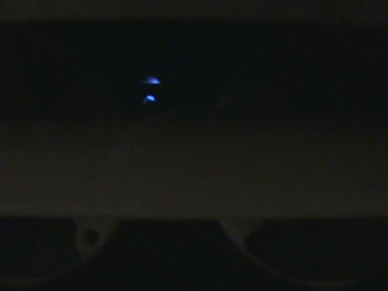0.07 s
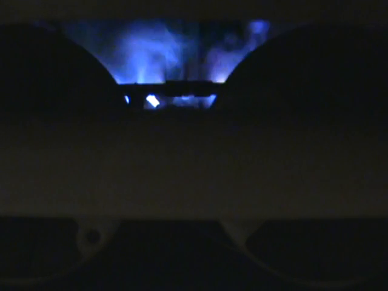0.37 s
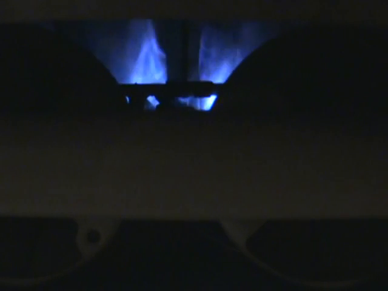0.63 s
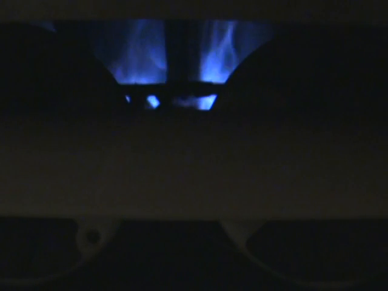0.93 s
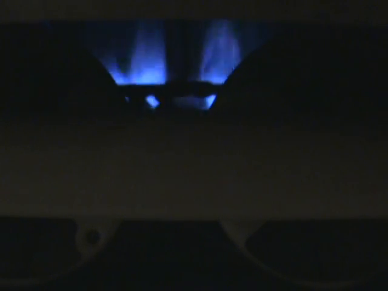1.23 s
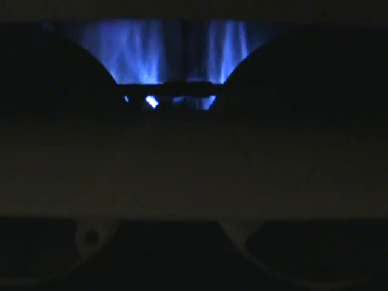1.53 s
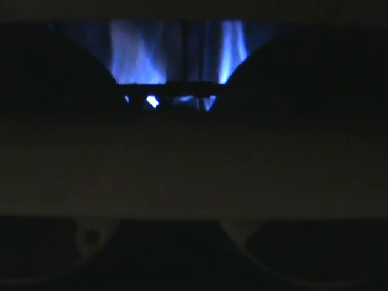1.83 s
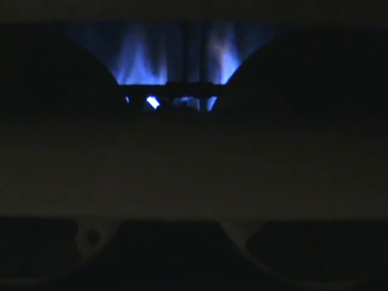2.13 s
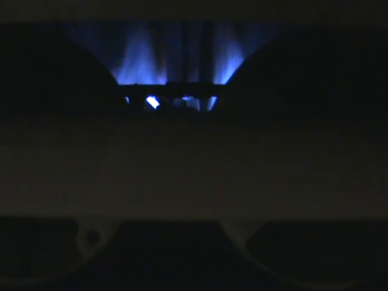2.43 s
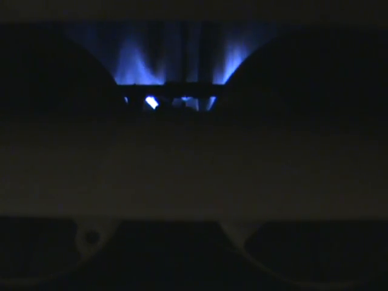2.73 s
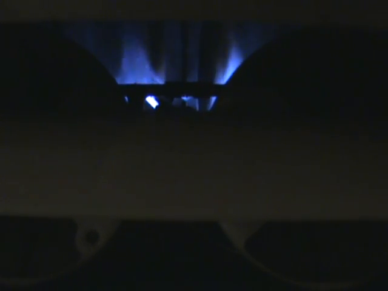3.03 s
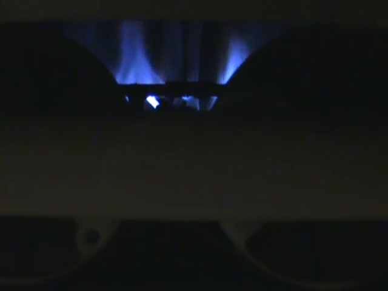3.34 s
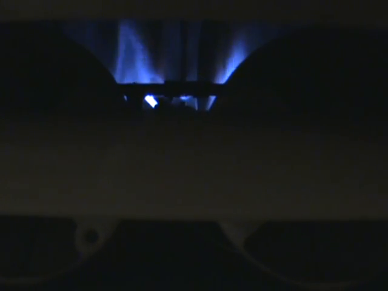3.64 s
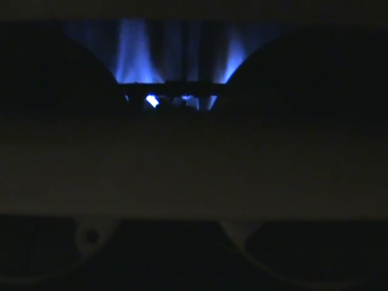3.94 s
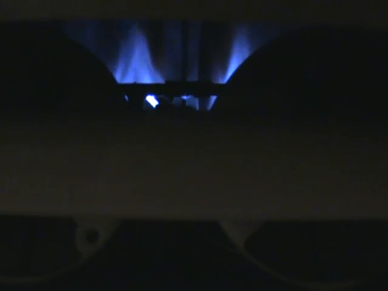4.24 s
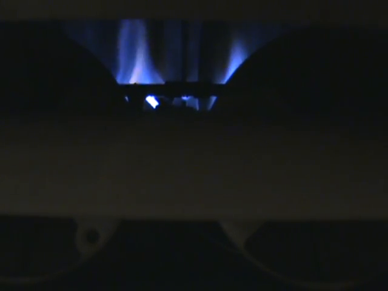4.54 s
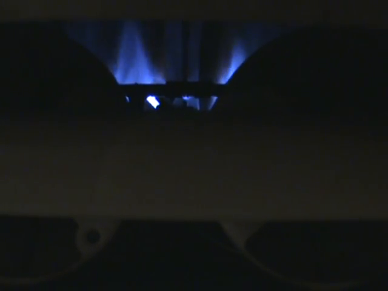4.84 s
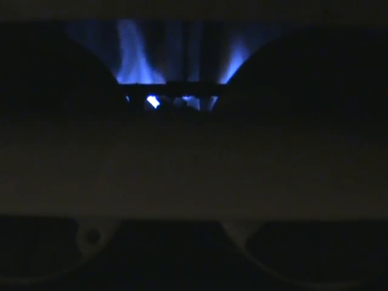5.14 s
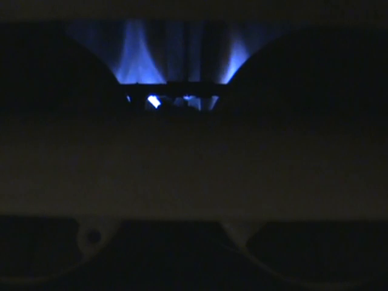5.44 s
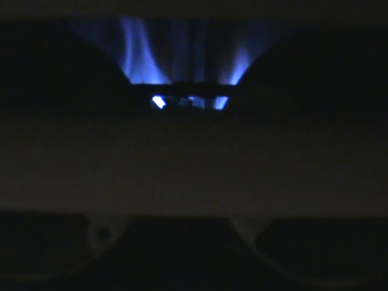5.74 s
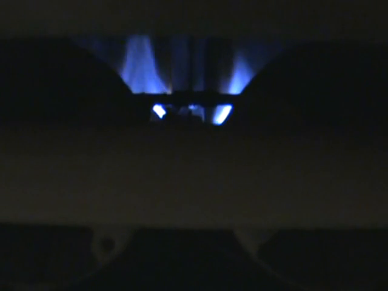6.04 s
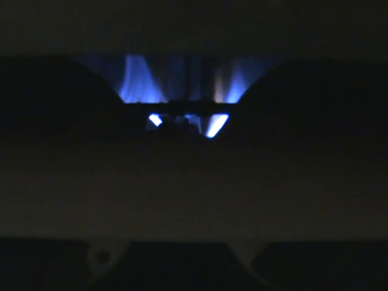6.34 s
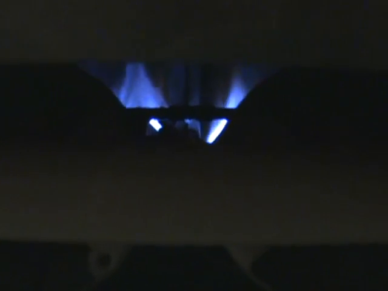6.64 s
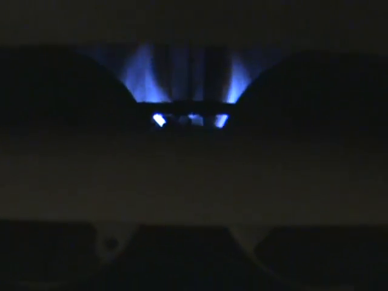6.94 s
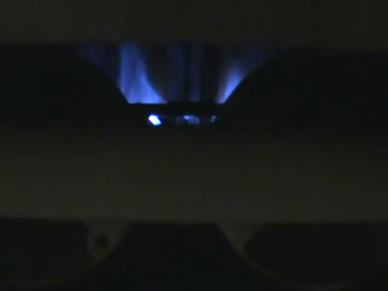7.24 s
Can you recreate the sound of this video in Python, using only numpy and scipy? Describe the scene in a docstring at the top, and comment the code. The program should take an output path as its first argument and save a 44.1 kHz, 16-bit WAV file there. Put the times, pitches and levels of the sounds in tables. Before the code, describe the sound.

A gas furnace clacks and lights with a low whoosh, then roars and hisses while its igniter ticks rapidly, stopping near the end.

```python
"""Beside a gas furnace as it lights. The valve clacks open, gas hisses from the jet and rushes through
the burner tube, and an igniter sparks 15 times a second. The gas catches with a low whoosh and a brief
howl, then the flames roar and boom in the chamber, whose resonances (the notes it favours) shift as
the gas in it heats up. The igniter stops shortly before the end."""
import sys
import numpy as np
from scipy import signal
from scipy.fft import rfft, irfft
from scipy.io import wavfile
from scipy.ndimage import uniform_filter1d

SR = 44100
rng = np.random.default_rng(int(sys.argv[2]) if len(sys.argv) > 2 else 0)


def wav_out(sig):
    """Save sig, one row per channel (or a flat mono array), as 16-bit PCM at SR to the path in sys.argv[1]."""
    wavfile.write(sys.argv[1], SR, np.round(np.clip(np.atleast_2d(sig).T, -1, 1) * 32767).astype(np.int16))


N = 325899
TIME = np.arange(N) / SR

# The tone of a spark or a sharp knock. Each row: frequency in Hz, relative level in dB.
CRACK = [(400, -13.5), (1300, -6.5), (2200, -13), (3600, -7.5), (4400, -3.5), (5400, -5.5), (6700, -1.5),
         (8000, -1.5), (9500, -1.5), (11200, -3.5), (13500, -7.5), (15400, -7), (16500, -21)]
# The gas flow, which falters while the burner lights.
# Each row: time in seconds, level of the tube's rush in dB, level of the jet's hiss in dB.
FLOW = [(0, -40, -38), (.05, -37.5, -46), (.1, -43.5, -49), (.17, -36.5, -33), (.32, -36, -32),
        (.39, -47, -36.5), (.55, -33, -33), (.63, -40.5, -38), (1.1, -37, -37), (2, -36.5, -31.5),
        (7.39, -36.5, -32)]
# Resonances of the burner tube, before heat shifts them. Each row: pitch in Hz, width in Hz, lift in dB.
TUBE = [(1653, 80, 11), (1845, 42, 10.5), (2100, 110, 7.5), (2406, 147, 8), (2658, 74, 9), (2958, 108, 9.5),
        (3215, 94, 10), (3530, 120, 10.5)]


def gain_of(db):
    """Turns decibels into a factor to multiply a sound by."""
    return 10 ** (np.asarray(db) / 20)


def evened(x):
    """Scales a signal to an average strength (rms) of 1."""
    return x / np.sqrt(np.mean(abs(x) ** 2) + 1e-20)


def read(rows, hz, column=1):
    """Looks up a table by frequency, gliding between rows on a log scale."""
    table = np.transpose(rows)
    return np.interp(np.log(hz + 1), np.log(table[0] + 1), table[column])


def curve(rows, t=TIME, column=1):
    """Looks up a table by time, gliding between rows."""
    table = np.transpose(rows)
    return np.interp(t, table[0], table[column])


def peaks(modes, hz):
    """The lift in dB that a set of resonances gives each frequency."""
    return sum(db / (1 + (2 * (hz - pitch) / width) ** 2) for pitch, width, db in modes)


def envelope(start_s, rise_s, end_s, fade_s):
    """A level that rises in a straight line, holds until end_s, then dies away."""
    return np.clip((TIME - start_s) / rise_s, 0, 1) * np.exp(-np.maximum(TIME - end_s, 0) / fade_s)


def swells(rows):
    """Rounded rises in level, each with its length taken at half height."""
    return sum(gain_of(db) * np.exp2(-abs(2 * (TIME - s) / length) ** np.e) for s, length, db in rows)


def wander(rate_hz):
    """A smooth random wobble, with little movement faster than rate_hz."""
    hz = np.fft.rfftfreq(N, 1 / SR)
    return evened(irfft(rfft(rng.standard_normal(N)) * np.exp(-(hz / rate_hz) ** 2), N))


def add(mix, start_s, sound):
    """Mixes a stereo sound in at its start time."""
    part = mix[:, max(round(start_s * SR), 0):][:, :sound.shape[1]]
    part += sound[:, :part.shape[1]]


def stereo_spectra(hz, shape):
    """Random spectra as the left and right openings of a microphone hear them."""
    # Each row: frequency in Hz, likeness of the sides (0-1), left's lead in radians, left over right in dB.
    ports = [(30, 0.75, -0.9, 2), (101, 0.98, -1.36, -0.5), (220, 0.81, -1.42, -1), (407, 1, -2, -0.5),
             (656, 0.79, -1.5, -1), (884, 0.95, -1.5, -0.5), (1170, 0.29, -0.5, -1.5),
             (1970, 0.99, -1.1, -2), (3740, 0.71, 0.1, 0.7), (5550, 0.92, 0.5, -0.4),
             (7660, 0.97, 0.42, -1), (9870, 0.8, -0.9, 0), (11720, 0.9, 1.63, 1), (13300, 0.5, 4, 3),
             (14500, 0.7, 1, 0), (15300, .43, -2.5, 1)]
    a, b, c, d = rng.standard_normal((4, *shape))
    same = np.clip(read(ports, hz), 0, 1)
    left = a + 1j * b
    lag = np.exp(-1j * read(ports, hz, column=2))
    right = (same * left + np.sqrt(1 - same ** 2) * (c + 1j * d)) * lag
    lean = gain_of(read(ports, hz, column=3) / 2)
    return np.array([left * lean, right / lean])


def burst(colour, bright_db, size=4096):
    """Short stereo noise with the tone colour(hz), tilted by bright_db per octave above 4000 Hz."""
    hz = np.fft.rfftfreq(size, 1 / SR)
    tilt = bright_db * np.log2(np.maximum(hz, 4000) / 4000)
    return evened(irfft(stereo_spectra(hz, hz.shape) * gain_of(colour(hz) + tilt)))


def turbulence(colour, size=2048):
    """The stereo noise of swirling gas, with its tone in dB given by colour(hz, speed of sound)."""
    # Sound travels faster in hotter gas. Each row: time in seconds, relative speed of sound.
    heat = [(.15, 0.89), (.3, 1.02), (.5, 1.04), (.68, 1.15), (1.1, 1.1), (1.4, 1.044), (2.4, 1),
            (7.39, 1.003)]
    hop = size // 4
    t, hz = np.arange(N // hop + 5) * hop / SR, np.fft.rfftfreq(size, 1 / SR)
    spectra = stereo_spectra(hz, (len(t), len(hz))) * gain_of(colour(hz, curve(heat, t)[:, None]))
    _, noise = signal.istft(spectra.transpose(0, 2, 1), nperseg=size, noverlap=size - hop)
    return evened(noise[:, :N])


def valve(knock_s=0.0018, casing_db=-22, casing_s=0.037):
    """The plunger leaves and hits its stop: it knocks, the valve body rings and the casing echoes."""
    # Each row: start in seconds, level in dB, share that rings the valve body.
    knocks = [(.0025, -13, 0.11), (.0045, -22, 0.17), (.009, -12.5, 0.78)]
    # Valve body and gas pipe. Each row: pitch in Hz, relative level in dB, seconds to fade by 60 dB.
    body_modes = [(336, -25, .4), (545, -32.5, 0.86), (788, -26, 0.22), (1567, -27, 0.54), (1760, -26, 0.5),
                  (1910, -21, 0.058), (2900, -23, 0.13), (6240, -1, 0.034), (6900, -6, 0.036),
                  (7900, -5, 0.072), (8450, 4, 0.025), (8850, -1.5, .04), (9430, 3, 0.024)]
    out, t = np.zeros((2, N)), np.arange(16384) / SR
    fade = np.exp(-t / knock_s) + gain_of(casing_db) * np.exp(-t / casing_s)
    for start, db, share in knocks:
        knock = burst(lambda hz: read(CRACK, hz), bright_db=-2, size=len(t)) * fade
        ring = sum(gain_of(level - 60 * t / ring_s) * np.sin(2 * np.pi * (hz * t + rng.random()))
                   for hz, level, ring_s in body_modes)
        add(out, start, gain_of(db) * (knock + share * ring))
    return out


def jet(flutter_db=0.67, ripple_db=0.5, dulling=14):
    """Gas hisses out of a small hole; the casing's many small resonances ripple its tone."""
    # Each row: frequency in Hz, relative level in dB.
    hiss_tone = [(3000, -22), (3900, -6.5), (4400, -2), (5250, 1), (6600, 0), (7100, -3.5), (7900, -2.5),
                 (9500, -5), (10600, -11), (12000, -10), (13600, -18), (15300, -13), (16000, -30)]
    # Resonances of the steel casing. Each row: pitch in Hz, width in Hz, lift in dB.
    casing = [(3990, 69, -1), (3950, 56, 4.5), (4990, 62, 3), (5340, 87, 5), (5400, 85, -1),
              (6730, 240, 1.5), (7440, 92, 6.5), (8340, 130, 4), (9950, 220, 7)]

    def colour(hz, speed):
        """The hiss through the casing; its treble dulls while the gas is hottest."""
        ripple = evened(uniform_filter1d(rng.standard_normal(len(hz)), size=2))
        treble_loss = dulling * np.maximum(speed - 1, 0) * np.log2(np.maximum(hz / 8000, 1))
        return read(hiss_tone, hz) + peaks(casing, hz) + ripple_db * ripple - treble_loss
    return turbulence(colour) * gain_of(curve(FLOW, column=2) + flutter_db * wander(36))


def burner(throat_db=-39.5, throat_follow=0.4, build_s=0.057, flutter_db=0.5):
    """Gas and air sound the burner tube's higher resonances, and its throat as the draught builds."""
    # In both tables, each row: frequency in Hz, relative level in dB.
    rush_tone = [(300, -8.5), (700, -7), (1020, -10.5), (1150, 1.5), (1400, 0.5), (1550, -5), (2400, -4.5),
                 (3200, -2), (3560, -5), (3750, -11.5), (4500, -30), (7000, -30)]
    throat_tone = [(600, -33), (760, -13.5), (810, -5.5), (865, 1), (960, -1.5), (1005, -24), (1200, -63)]
    rush = turbulence(lambda hz, speed: read(rush_tone, hz) + peaks(TUBE, hz / speed ** 0.46))
    throat = turbulence(lambda hz, speed: read(throat_tone, hz / speed)) * (1 - np.exp(-TIME / build_s))
    flow_db = curve(FLOW)
    both = rush * gain_of(flow_db) + throat * gain_of(throat_db + throat_follow * (flow_db - flow_db[-1]))
    return both * gain_of(flutter_db * wander(26))


def igniter(first_s=0.0491, period_s=0.06666, count=98, boost_db=5.5, uneven_db=0.43, alike=0.61):
    """Sparks fire on a steady clock. Each snaps, bounces off the nearest steel wall and scatters."""
    # The electrode and its bracket ring. Each row: pitch in Hz, width in Hz, lift in dB.
    bracket = [(2190, 300, 9.5), (4250, 680, 4), (6480, 1100, 4), (9130, 830, 2.5)]
    # Sparks are weak in still air and as the flame passes. Each row: time in seconds, relative level in dB.
    strength = [(.05, -35.5), (.18, -24.5), (.316, -24.5), (.38, -31.5), (.6, -28.5), (1, -24.5),
                (1.45, -22), (2.2, -26), (2.55, -23.5), (6.5, -24.5)]
    out, t = np.zeros((2, N)), np.arange(4096) / SR
    snap = gain_of(-1) * np.exp(-(t / 0.00063) ** 2)
    echo = gain_of(-9) * np.exp(-abs(t - 0.0024) / 0.00043)
    ring = np.exp(-t / 0.0044)
    tail = gain_of(-24) * np.exp(-t / 0.017)
    fade = np.sqrt(snap ** 2 + echo ** 2 + ring ** 2) + tail

    def colour(hz):
        """The crack with the bracket's ring."""
        return read(CRACK, hz) + peaks(bracket, hz)
    walls = burst(colour, bright_db=0)
    for start in first_s + period_s * np.arange(count):
        # the walls scatter every spark alike, but each spark takes its own path
        own_path = burst(colour, bright_db=1.5 * rng.standard_normal())
        crack = np.sqrt(alike) * walls + np.sqrt(1 - alike) * own_path
        squashed = np.tanh(0.55 * crack)
        tick = evened(fade * squashed) * np.sqrt(np.mean(fade ** 2))
        level_db = curve(strength, start) + boost_db + uneven_db * rng.standard_normal()
        add(out, start, gain_of(level_db) * tick)
    return out


def roar(boost_db=1, flutter_db=2.0):
    """The swirling flames make a low, fluttering roar with a few gusts."""
    # Each row: frequency in Hz, relative level in dB.
    roar_tone = [(15, -21), (35, -4), (60, 9), (130, 7), (195, -7), (250, -3.5), (310, 4), (410, -9),
                 (470, 1.5), (550, -5.5), (660, -12), (720, -9.5), (1100, -22.5), (2500, -41)]
    # The flames light and settle. Each row: time in seconds, relative level in dB.
    fire = [(0, -56), (.17, -43), (.25, -32.5), (.55, -25.5), (.85, -36.5), (1.45, -36.5), (2.3, -43),
            (7.39, -43)]
    # The flames gutter and roar up. Each row: middle and length in seconds, relative level in dB.
    gusts = [(.71, 0.097, -27.5), (1.6, 0.081, -35), (4.65, 0.055, -44), (5.31, 0.038, -47), (6.5, .1, -49),
             (7.19, .06, -43)]
    noise = turbulence(lambda hz, speed: read(roar_tone, hz), size=4096)
    return noise * (gain_of(curve(fire)) + swells(gusts)) * gain_of(boost_db + flutter_db * wander(28))


def boom(waver_hz=11, shudder_hz=26, settled_s=1.75, settle_s=0.33, lean_db=-2.0, rumble_db=-12):
    """The flames pump the chamber's lowest note over a rumble; the harder they drive it, the steadier."""
    # The boom builds and settles. Each row: time in seconds, relative level in dB.
    strength = [(.165, -61), (.255, -19), (.33, -20), (.37, -15.5), (.64, -16), (.77, -22.5), (.85, -30.5),
                (2.4, -33.5), (7.39, -33.5)]
    # Each row: time in seconds, pitch in Hz.
    pitch = [(.2, 88.97), (.4, 96.83), (.57, 97.97), (.7, 109.5), (1.1, 108.7), (1.3, 101.1), (2, 97.2),
             (7.39, 97)]
    # The flames lock to the note and it swells. Each row: middle and length in seconds, level in dB.
    surges = [(1.33, 0.029, -21), (2.57, 0.1, -28), (3.03, 0.14, -29), (3.56, 0.082, -31),
              (3.81, 0.069, -29.5), (4.12, .26, -33), (4.64, 0.12, -26.5), (5.19, 0.11, -30),
              (6.22, 0.18, -27.5), (6.58, 0.11, -29), (7.05, 0.074, -28), (7.35, .12, -31)]
    # Each row: frequency in Hz, relative level in dB.
    rumble_tone = [(15, -24), (35, -21), (60, -11), (85, 21.5), (125, 10.5), (160, -27), (220, 0),
                   (500, -52)]
    base, surge = gain_of(curve(strength) + 1), swells(surges)
    steady = 1.42 + 3.5 * base / base.max()
    waver = wander(waver_hz) + 1j * wander(waver_hz)  # complex, so both level and phase wobble
    unrest = 1.52 * np.exp(-np.maximum(TIME - settled_s, 0) / settle_s)  # the young flame shudders
    shudder = unrest * (wander(shudder_hz) + 1j * wander(shudder_hz))
    swing = (steady + waver + shudder) / np.sqrt(2 + steady ** 2 + 2 * unrest ** 2)
    note = (base * swing + surge) * np.exp(2j * np.pi * np.cumsum(curve(pitch)) / SR)
    lean = gain_of(lean_db / 2)
    pair = np.sqrt(2) * np.array([note * lean, note * np.exp(1j) / lean]).real  # right leads by 1 radian
    rumble = turbulence(lambda hz, speed: read(rumble_tone, hz), size=4096)
    return pair + (base + surge) * gain_of(rumble_db) * rumble


def whoosh(start_s=0.21, rise_s=0.12, level_db=-23, sag_db_per_s=6, flutter_db=3.0, puff_s=0.028):
    """The flame front sweeps through the hollow chamber, jumping from one pocket of gas to the next."""
    # Each row: frequency in Hz before heat shifts it, relative level in dB.
    burn_tone = [(15, -19), (45, 2), (130, 4.5), (190, -4), (330, 0.5), (420, -10), (540, -20), (720, -29),
                 (1000, -16.5), (2000, -50)]
    # The chamber's resonances, also shifted by heat. Each row: pitch in Hz, width in Hz, lift in dB.
    chamber = [(242, 27, 12.5), (323, 51, 2.5), (474, 55, 4), (613, 55, 13.5), (940, 60, 5),
               (1210, 50, 11.5), (1472, 170, 20)]
    # Pockets of gas catch. Each row: start in seconds, level in dB.
    puffs = [(0.201, -24), (0.246, -19), (.35, -25), (.528, -25), (.682, -33)]
    level = envelope(start_s, rise_s, end_s=0.73, fade_s=0.036)
    level *= gain_of(level_db - sag_db_per_s * (TIME - start_s - rise_s) + flutter_db * wander(32))
    for start, db in puffs:
        age = np.maximum(TIME - start, 0)
        level += gain_of(db) * np.exp(-age / puff_s) * (1 - np.exp(-age / 0.00076))

    def colour(hz, speed):
        """A sudden burn in the chamber, its tone rising with the heat."""
        unshifted_hz = hz / (speed / 0.974) ** 0.28
        return read(burn_tone, unshifted_hz) + peaks(chamber, unshifted_hz)
    return turbulence(colour, size=4096) * level


def flare(level_db=-35, centre_hz=2200, width_octaves=0.61):
    """The gas and air mixture flares in the burner tube."""
    def colour(hz, speed):
        """A broad hump with the tube's resonances, which rise with the heat."""
        hump = -4.2 * (np.log2((hz + 1) / centre_hz) / width_octaves) ** 2
        return hump + peaks(TUBE, hz / speed ** 0.41)
    return turbulence(colour) * gain_of(level_db) * envelope(0.25, rise_s=0.42, end_s=1, fade_s=0.19)


def howl(peak_s=0.36, width_s=0.093, level_db=-29, pitch_hz=617, rise_hz_per_s=250, roughness=0.76):
    """A chamber resonance howls briefly as the flame front passes, rising as the chamber heats."""
    swing = evened(1 + roughness * (wander(40) + 1j * wander(40)))
    note = swing * np.exp(2j * np.pi * np.cumsum(pitch_hz + rise_hz_per_s * (TIME - peak_s)) / SR)
    level = gain_of(level_db) * np.exp(-abs(TIME - peak_s) / width_s)
    return level * evened(np.array([note, note * np.exp(1.3j)]).real)  # right leads by 1.3 radians


def scene():
    """Valve, igniter, gas flow and fire, added together."""
    return valve() + igniter() + jet() + burner() + whoosh() + flare() + howl() + boom() + roar()


def record(dry):
    """Cuts the highest treble, above 16100 Hz."""
    lowpass = signal.firwin(301, 16100, window=("kaiser", 9), fs=SR)
    return signal.oaconvolve(dry, lowpass[None], "same", axes=1)


dry = scene()
out = record(dry)
wav_out(out)
```